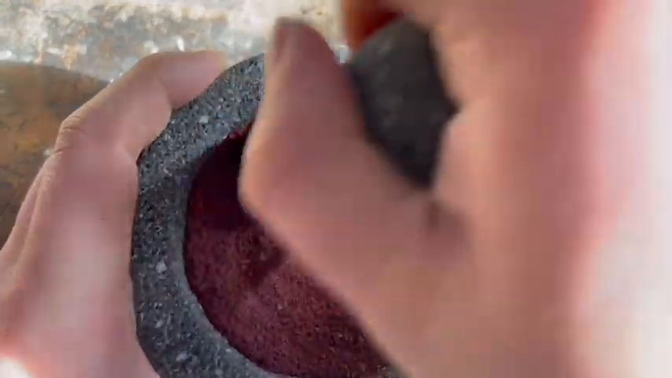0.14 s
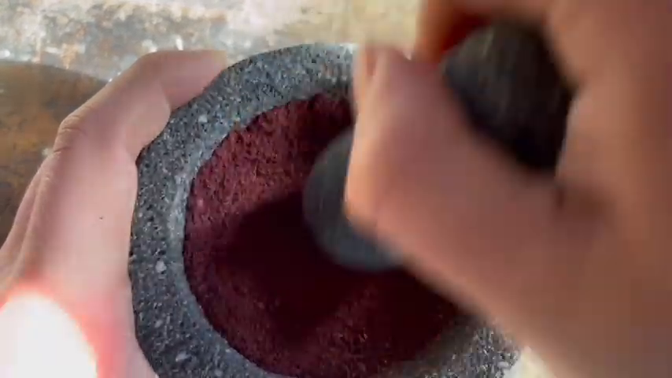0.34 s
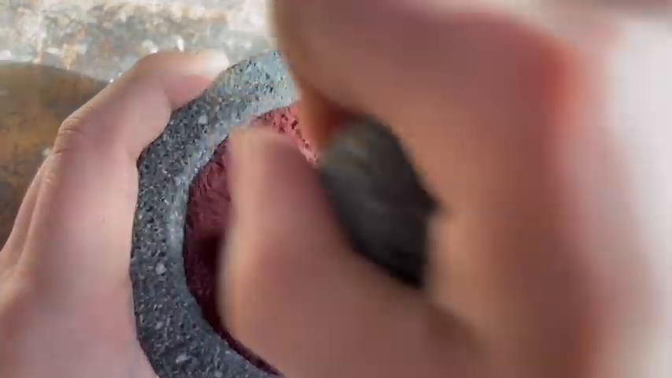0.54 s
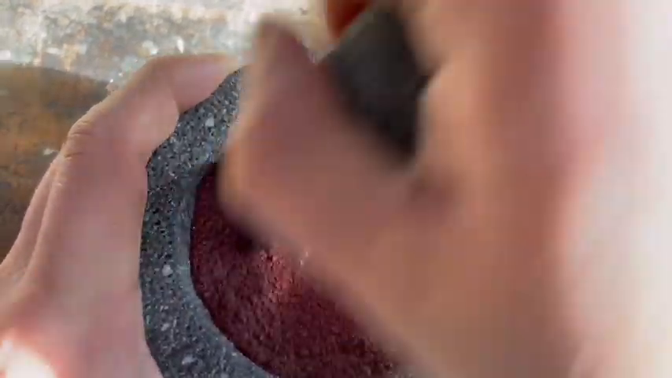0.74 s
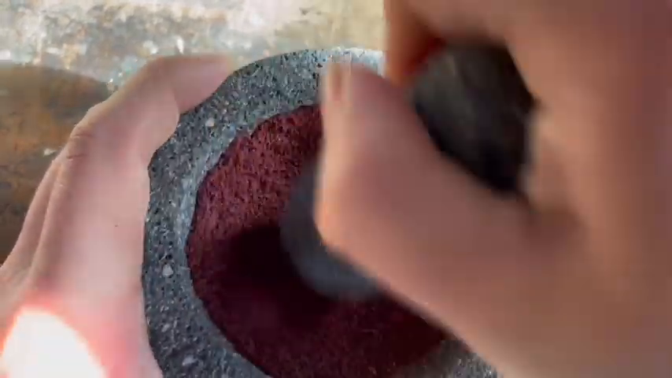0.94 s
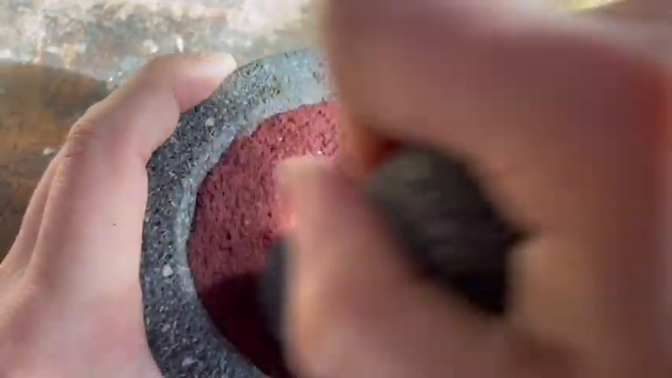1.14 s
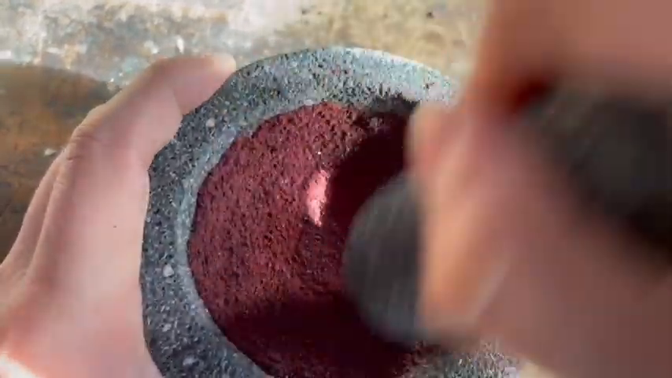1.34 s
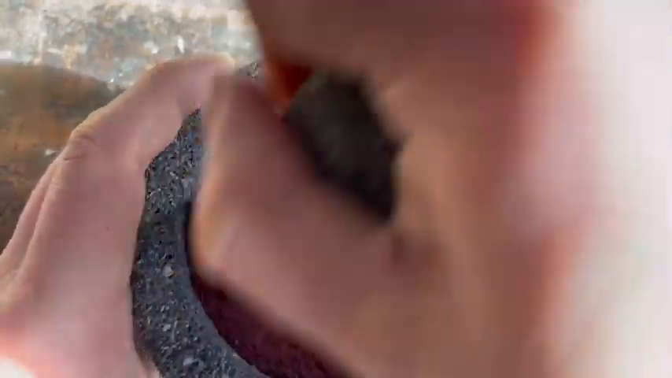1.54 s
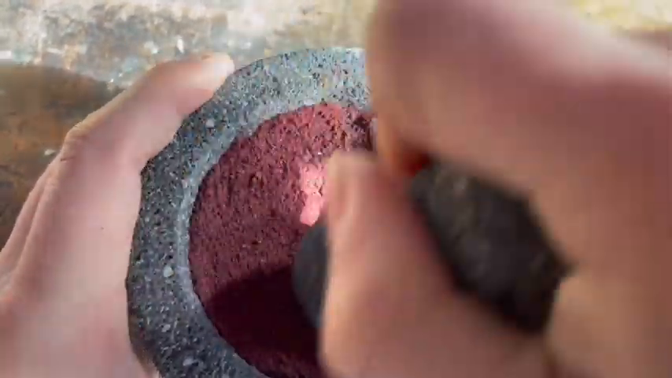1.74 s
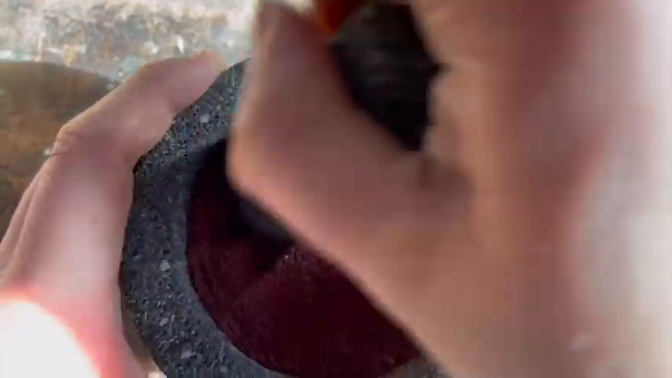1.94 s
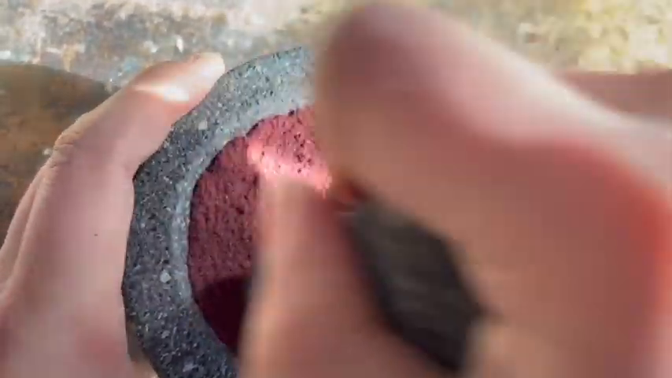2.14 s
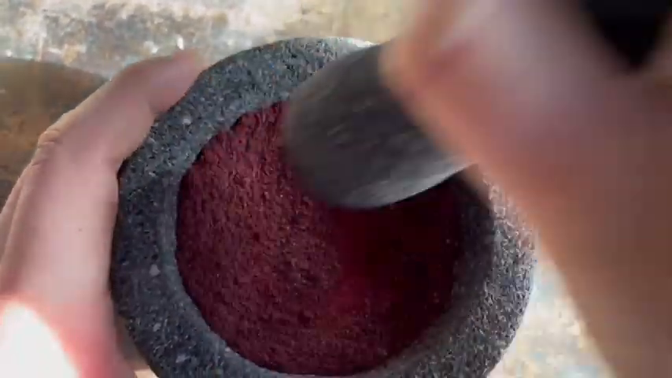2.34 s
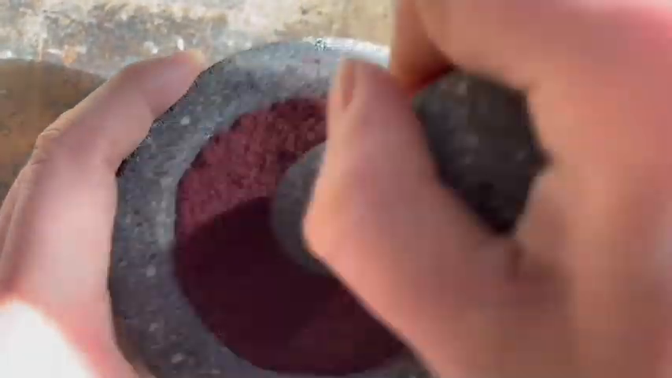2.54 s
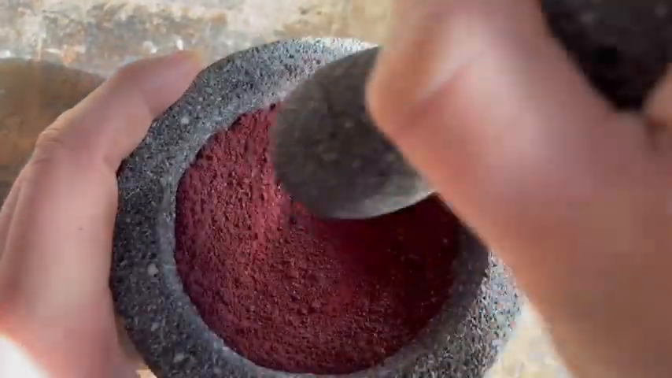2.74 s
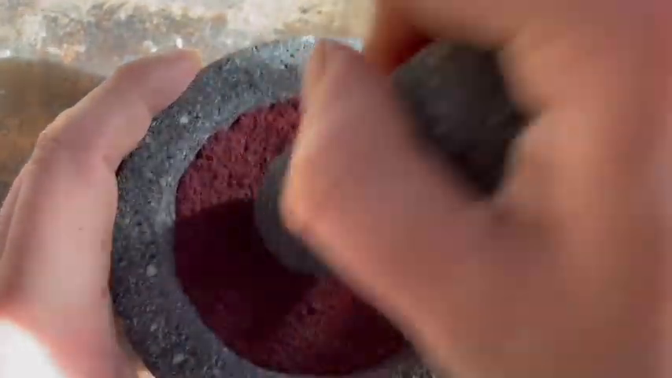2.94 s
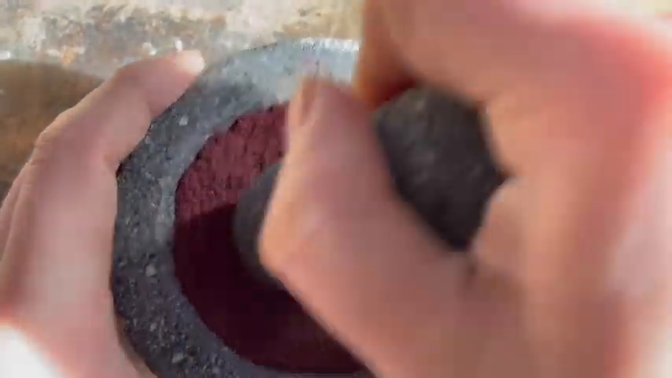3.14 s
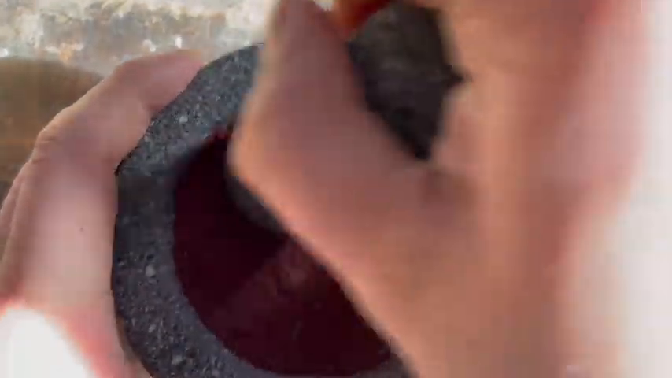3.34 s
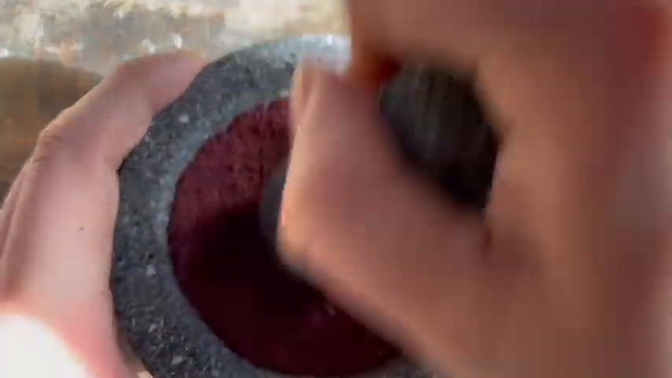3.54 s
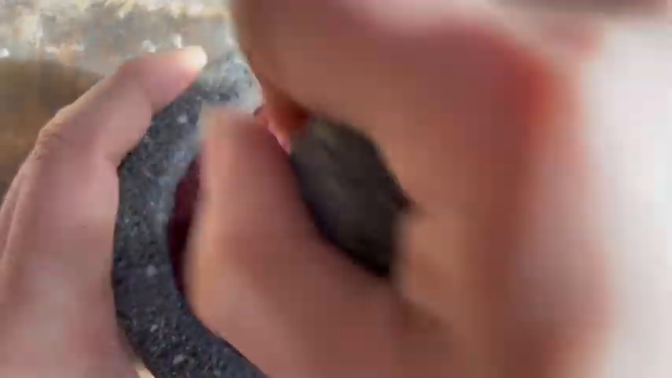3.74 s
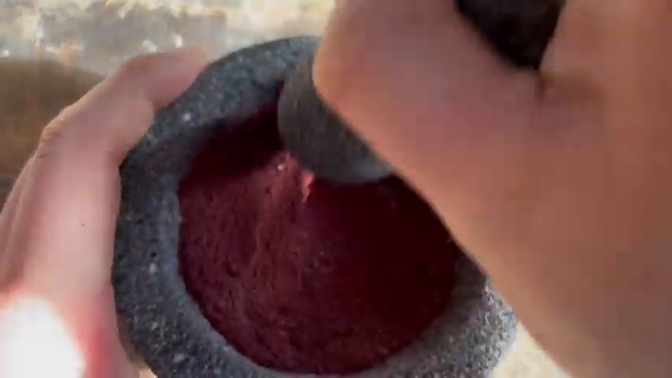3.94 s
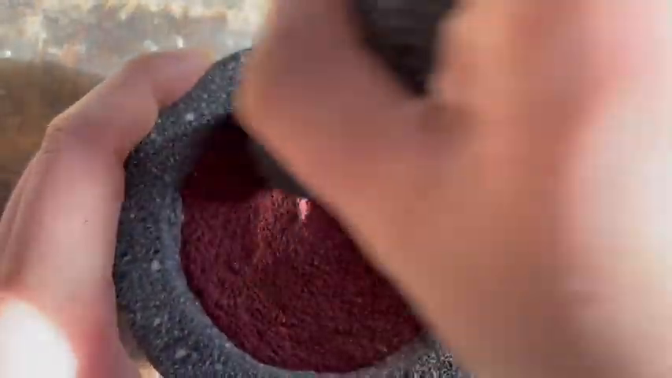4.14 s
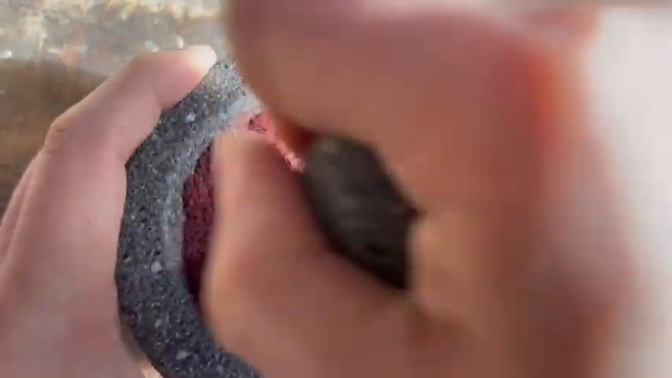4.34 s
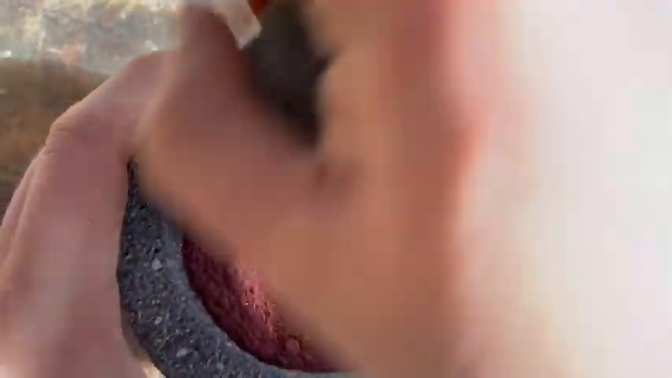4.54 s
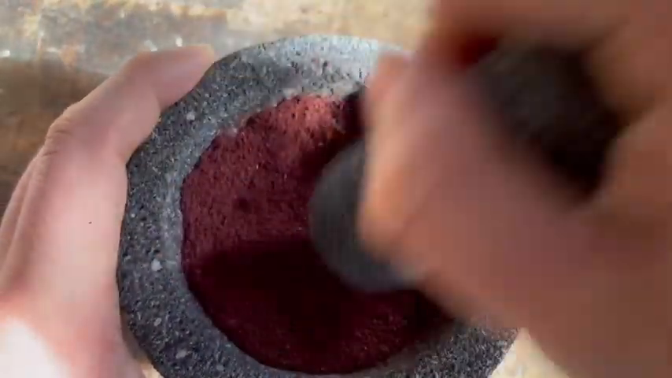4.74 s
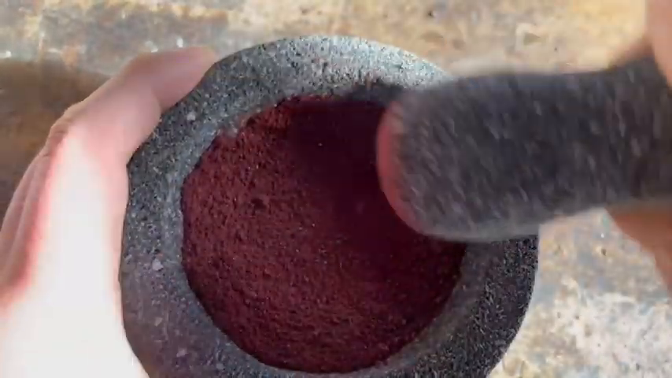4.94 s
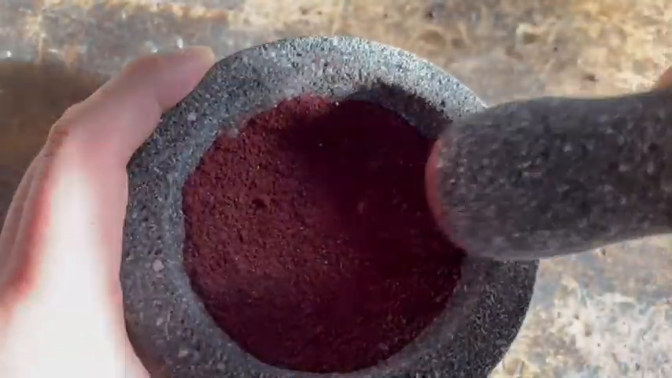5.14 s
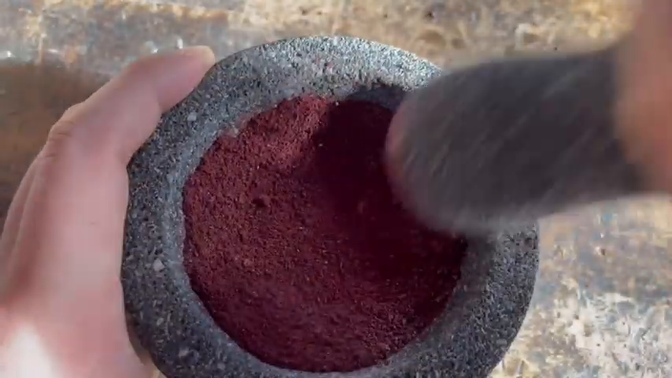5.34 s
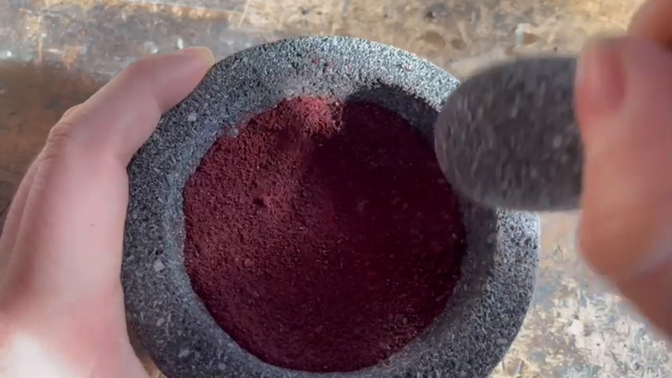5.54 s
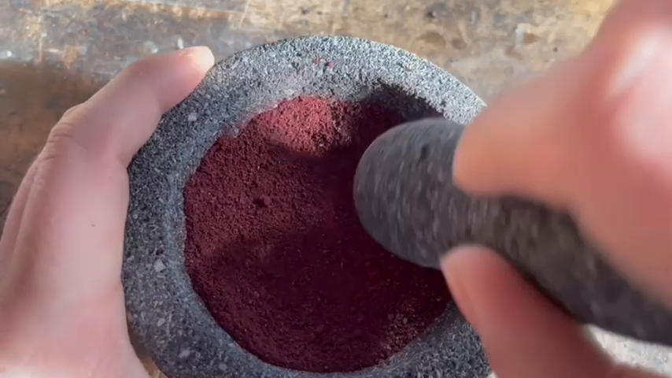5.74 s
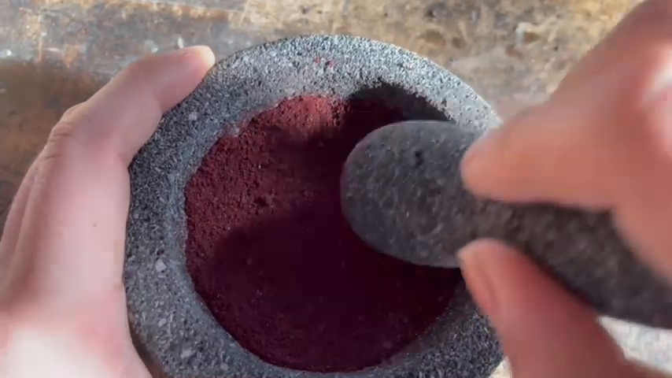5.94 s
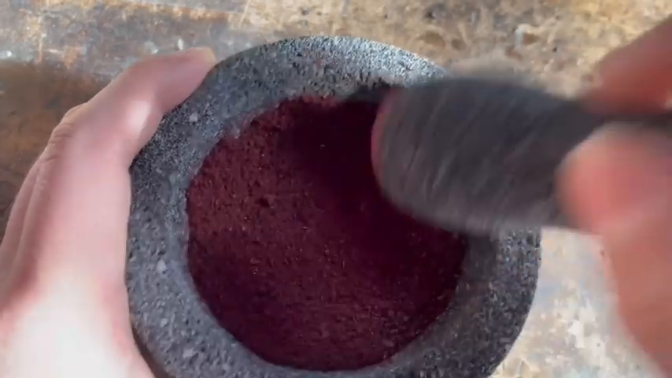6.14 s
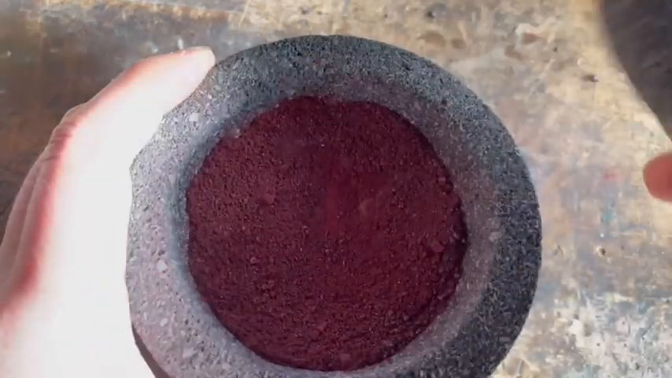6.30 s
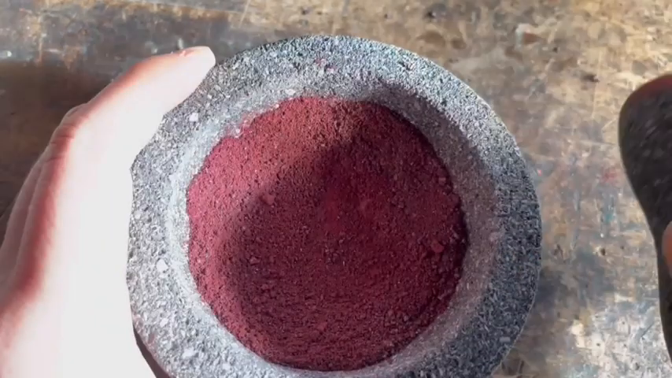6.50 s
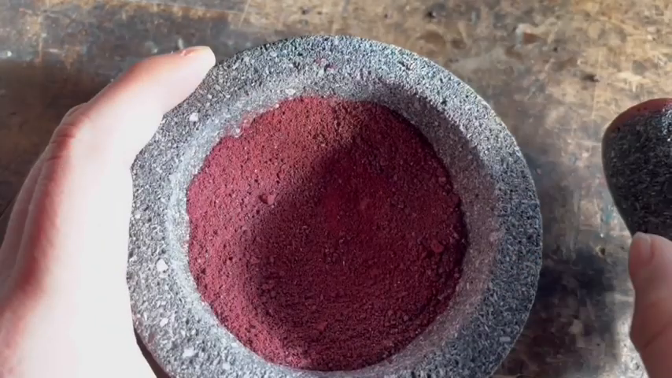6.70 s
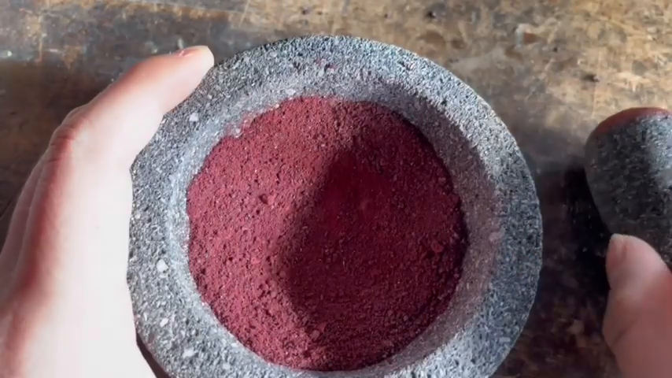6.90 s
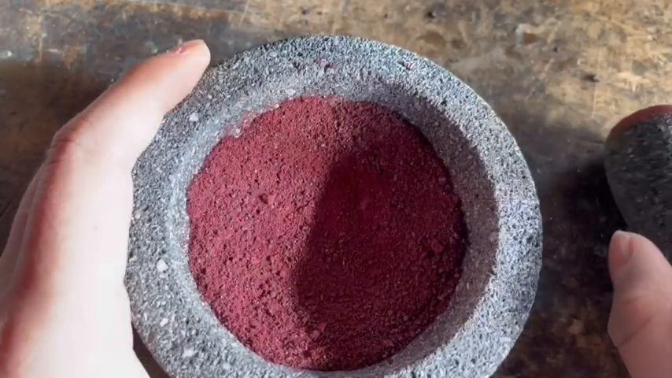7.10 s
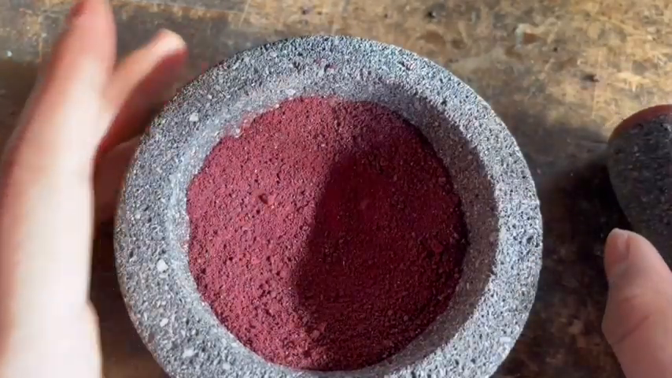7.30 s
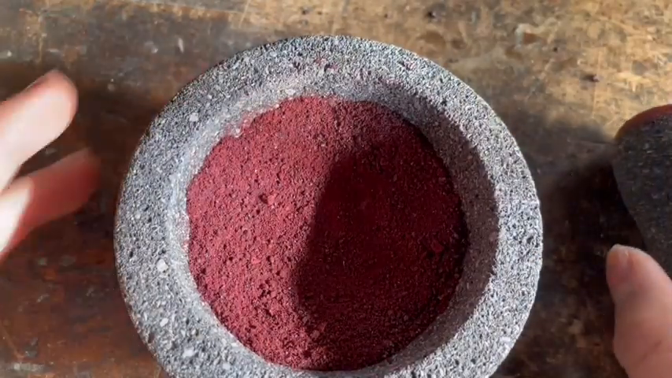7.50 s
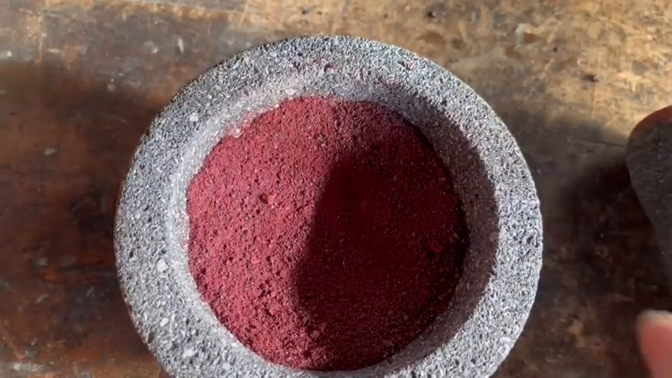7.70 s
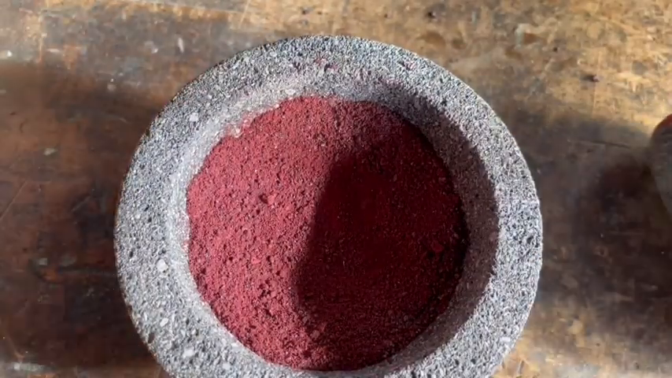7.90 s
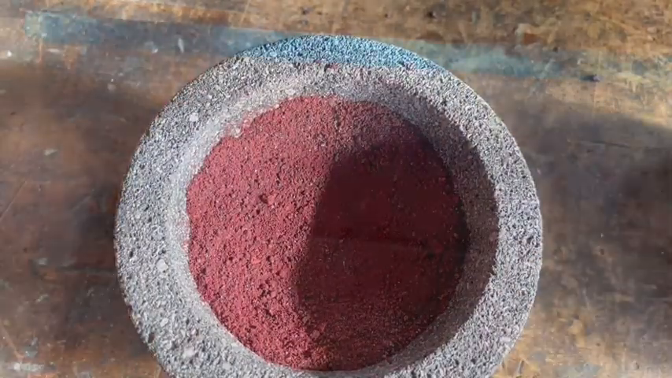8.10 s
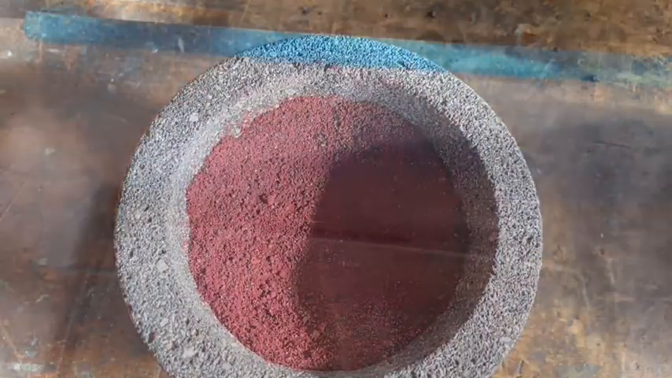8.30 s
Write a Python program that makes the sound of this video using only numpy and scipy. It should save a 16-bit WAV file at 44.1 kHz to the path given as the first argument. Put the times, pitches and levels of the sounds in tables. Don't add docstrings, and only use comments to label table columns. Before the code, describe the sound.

Very close to a small stone mortar, a pestle grinds dry powder in uneven gritty strokes, with lumps crunching. Three hard knocks interrupt, grinding resumes with more blows and low table thuds, then bright taps strike the rim. The pestle is set down on the wooden table with a clattering clunk, and a hand slides softly off the stone. Small indoor room, faint hum.

```python
import sys
import numpy as np
from scipy import signal
from scipy.fft import rfft, irfft, next_fast_len
from scipy.io import wavfile
from scipy.ndimage import uniform_filter1d

SR = 44100
rng = np.random.default_rng(int(sys.argv[2]) if len(sys.argv) > 2 else 0)


def inscribe(sig):
    pcm = np.round(np.clip(np.atleast_2d(sig).T, -1, 1) * 32767)
    wavfile.write(sys.argv[1], SR, pcm.astype(np.int16))


def boost_factor(decibels):
    exponent = np.asarray(decibels, float) / 20
    return 10 ** exponent


N = 368659

# (time [s], peak [dB], then below the peak: pestle ring [dB],
# thick rim [dB], bowl wall [dB])
KNOCK_ROWS = [(0.1592, -27.5, -25, -35, 3), (0.8841, -32, -22, -20, 1.5), (1.0341, -23.5, -11, -44, -8.5),
              (1.3419, -36, -14, -32, -30), (1.97, -29.5, -29, -16, 5), (2.2185, -27.5, -42, -31, 0),
              (2.5199, -7, -15, -13.5, -12.5), (2.809, -8, -26.5, -15.5, -12.5),
              (3.103, -5, -32.5, -25.5, -8), (3.6812, -15, -26, -52, -1), (3.9948, -32.5, -22, -16, -5),
              (4.2149, -11.5, -57, -63, -7), (4.536, -29.5, -15.5, -38.5, 1.5),
              (4.966, -4.5, -17.5, -23, -12), (5.3872, -33.5, 8.5, -11, 4.5),
              (5.686, -11.5, -11.5, -15.5, -10.5), (5.903, -8.5, -7.5, -15.5, -7.5),
              (6.0424, -6, -12, -13.5, -10.5)]
# (pitch [Hz], level when rubbed [dB], level when struck [dB], t60 [s])
BOWL_MODES = [(138, -16, -18, 0.083), (204.2, -8, -6, 0.076), (286.9, -17, -15, 0.17),
              (354, -3.5, -2, 0.041), (471, 0, -12, 0.038), (552, -4, -12, 0.08), (709, -4.5, 1.5, 0.039),
              (834.6, -14.5, -7.5, 0.044), (976, -11.5, 0, 0.027), (1112, -12.5, -12.5, 0.03),
              (1292, -6.5, -4, 0.025), (1443.4, -2, 2, 0.017), (1650, -0.5, -2, 0.0079),
              (1980, -7.5, 0.5, 0.011), (2320, -9.5, -8.5, 0.012), (2610, -14.5, -4.5, 0.014)]
# (time [s], peak [dB])
LAID_DOWN = [
    (6.77, -8),
]


def grinding():
    body_gain, grit_gain = strokes()
    judder = 0.8 * drift(20) + 1.4 * drift(70)
    bed_db = -8
    heavy = grit(6000, 2.5, judder + 0.54 * drift(15))
    heavy = heavy + boost_factor(bed_db + judder) * rng.standard_normal(N)
    fine = grit(7000, 2.7, 1.2 * judder + 1.2 * drift(150))
    fine = fine + boost_factor(bed_db + judder) * rng.standard_normal(N)

    body = rms_one(bowl(soften(heavy, 1800), wander_db=2.27, sway_db=3.0))
    body = boost_factor(-1.0) * body_gain * body
    groan = band_pass(body * on_rim(), 490 / 1.3, 490 * 0.85, order=1)
    bright = rms_one(pestle(fine, fizz_db=10.5, wander_db=2.57, sway_db=4.5))
    return body + boost_factor(7) * groan + boost_factor(3.5) * grit_gain * bright


def strokes():
    # (start [s], length [s], bowl and table [dB], grit and pestle [dB], change over it [dB])
    stroke_rows = [(.018, 0.11, -50.5, -58, 3), (.14, 1.014, -34.5, -48.5, 1.5),
                   (1.343, 0.15, -34, -46.5, -7.5), (1.5, 0.75, -34, -48, -3),
                   (2.24, 0.11, -62.5, -75.5, -10.5), (2.55, 0.25, -55, -79.5, -4.5),
                   (2.84, 0.22, -49.5, -95, -9), (3.13, 0.11, -50, -68.5, 6), (3.24, .44, -34, -49.5, -1),
                   (3.69, 0.15, -32, -47.5, -9), (3.996, .12, -36.5, -44, 2.5),
                   (4.12, 0.05, -39, -49.5, -19.5), (4.16, 0.047, -59, -74.5, 11),
                   (4.21, 0.48, -35, -50.5, 1), (4.98, 0.2, -36, -47.5, 2), (5.39, 0.098, -33.5, -44.5, -1),
                   (5.69, 0.073, -38.5, -48.5, -3), (5.92, 0.12, -39.5, -68, -19.5),
                   (6.05, 0.065, -35, -45.5, -10)]
    # (time [s], pressure [dB], half width [s])
    pressure_rows = [(0.173, 6, 0.019), (.575, -2, 0.018), (.2, 0.5, 0.0041), (.32, 5.5, 0.043),
                     (0.357, -10, 0.019), (0.625, 9, .02), (0.694, -16, 0.0064), (0.871, -7, 0.0094),
                     (.82, 3, 0.012), (.93, 3.5, 0.049), (0.979, -40, 0.0044), (1.013, -19, .008),
                     (1.06, 5, 0.037), (1.13, -4.5, 0.029), (1.484, 0, 0.0083), (1.589, 3, 0.035),
                     (1.711, -5, 0.011), (1.94, -6, 0.019), (1.999, 4, 0.08), (2.13, -2, 0.013),
                     (3.292, -9, 0.031), (3.344, -44, 0.012), (3.631, -15, 0.0074), (3.78, 3.5, 0.026),
                     (4.253, 6, 0.018), (4.51, -4, .02), (4.564, -6, 0.019), (4.64, 3, 0.027),
                     (5.42, -13, 0.011)]
    s = np.arange(N) / SR
    pressure_db = sum(db * np.exp(-((s - at) / width) ** 2) for at, db, width in pressure_rows)
    follows = [0.94, 0.87]
    rubbing = contacts(stroke_rows, attack_s=0.0019, release_s=0.0018)
    rubbing = rubbing * boost_factor(np.outer(follows, pressure_db))
    at, peak_db = np.transpose(KNOCK_ROWS)[:2]
    skid = die_away(clicks(at + 0.008, boost_factor(peak_db)), 0.011)
    return rubbing + skid * boost_factor([[-19], [-54]])


def grit(per_s, spread_db, clump_db):
    sizes = boost_factor(spread_db * np.minimum(rng.exponential(1, N), 5)) * rng.choice([-1, 1], N)
    return sizes * (rng.random(N) < per_s / SR) * boost_factor(clump_db)


def pestle(force, fizz_db, wander_db=0, sway_db=0):
    # (pitch [Hz], level in powder [dB], level on the rim [dB],
    # width in powder [Hz], width on the rim [Hz])
    pestle_modes = [(3202, 1.5, -8, 670, 150), (3607, -7, -6.5, 260, 29), (4980, -0.5, -12, 1900, 200),
                    (6050, 0, -2.5, 240, 130), (7463, -8, 3, 390, 54), (9145, -5.5, -5, 280, 170),
                    (11540, -15, -4.5, 920, 430), (11000, -8.5, -11, 1500, 760),
                    (13700, -21.5, -6.5, 350, 120), (12770, -10, -13, 510, 70), (15600, -33.5, -2, 200, 90)]
    bare = on_rim()
    out = boost_factor(fizz_db - 5.0 * bare) * band_pass(force, 1500, 12000)
    for k, (hz, powder_db, rim_db, powder_hz, rim_hz) in enumerate(pestle_modes):
        mode = boost_factor(powder_db) * ring(force * (1 - bare), hz, 1.81 / powder_hz)
        mode = mode + boost_factor(rim_db) * ring(force * bare, hz, 1.1 / rim_hz)
        if wander_db:
            sway = sway_db * drift(16) * 3000 / hz
            mode = mode * boost_factor(wander_db * drift(7.7) + np.array([sway, -sway]))
        out = out + (-1) ** k * mode
    return out


def on_rim():
    # (start [s], end [s], bare share [0-1])
    bare_rows = [
        (2.5, 2.54, .25),
        (3.95, 4.19, .45),
        (4.85, 5.57, 1.0),
        (5.675, 6.115, 1.0),
    ]
    s = np.arange(N) / SR
    return sum(share * ((s > start) & (s < end)) for start, end, share in bare_rows)


def bowl(force, wander_db=0, sway_db=0):
    out = 0
    for k, (hz, db, _, t60) in enumerate(BOWL_MODES):
        mode = (-1) ** k * boost_factor(db) * ring(force, hz, t60)
        if wander_db:
            sway = sway_db * drift(16)
            mode = mode * boost_factor(wander_db * drift(13) + np.array([sway, -sway]))
        out = out + mode
    return out


def cracks():
    # (time [s], bright peak [dB], dull part relative to it [dB])
    lump_rows = [(0.021, -34.5, 5.5), (0.144, -49.5, 11.5), (0.286, -27.5, -14), (0.3227, -23, -2),
                 (0.483, -25.5, 9.5), (0.611, -25, 7.5), (0.626, -17, -12), (.618, -20, -5),
                 (.189, -37, 9.5), (.591, -36, -2), (0.681, -28, 7.5), (0.779, -28.5, 11),
                 (.918, -31.5, -4), (0.934, -23.5, 5.5), (.965, -33.5, -0.5), (1.526, -36, 1),
                 (1.708, -34, 5), (5.062, -32.5, -0.5), (5.085, -28, 0.5), (5.164, -32.5, -1),
                 (5.186, -40.5, -5.5), (5.434, -33, -4), (1.578, -31, 0), (1.729, -38, -1), (1.812, -34, 4),
                 (1.96, -34, -4), (3.539, -31, 3), (3.57, -34.5, -3.5), (3.605, -32.5, 4),
                 (4.045, -25.5, 7), (4.088, -29, -7.5), (4.11, -23.5, -1.5), (4.2497, -31, 1.5),
                 (4.293, -35.5, 3), (4.381, -37, -3), (4.44, -29.5, 0), (4.478, -32, -1), (0.648, -25, 13),
                 (0.725, -30.5, 14.5), (0.8053, -44.5, 30), (0.9295, -18.5, 10), (0.951, -41, 11),
                 (1.149, -37.5, 20), (5.673, -58, 16), (1.5185, -30.5, 14.5), (2.2224, -58.5, 22),
                 (3.117, -34, 2.5), (3.255, -37, 16), (3.317, -29.5, 8.5), (3.3606, -37.5, 1.5),
                 (4.2694, -32, 19), (4.354, -57.5, 23), (4.613, -36.5, 15), (4.661, -34.5, 7),
                 (5.47, -23.5, 2), (5.4878, -26, 6), (7.3572, -45.5, -19), (7.3778, -52, -27)]
    # (time [s], peak [dB])
    tick_rows = [(2.369, -57), (2.447, -68.5), (2.568, -56.5), (2.882, -52), (2.279, -55), (2.295, -61),
                 (2.349, -67.5), (2.655, -66), (2.673, -68.5)]
    s, peak_db, dull_db = np.transpose(lump_rows + [(*row, -22.5) for row in tick_rows])
    splinters = rng.standard_normal((2, N))
    bright = pestle(swell(s, peak_db - 12.5, 0.0012) * splinters[0], fizz_db=10.0)
    dull = swell(s, peak_db + dull_db - 24.5, 0.0027) * splinters[1]
    return bright + bowl(soften(dull, 2700))


def knocks():
    # (time [s], peak [dB])
    touch_rows = [(2.51, -31), (2.798, -41.5), (3.092, -44.5), (5.891, -53.5), (6.031, -46.5)]
    # (pestle ring [dB], thick rim [dB], bowl wall [dB])
    touch_colour = (-15.5, -17.5, -9)
    # (time [s], peak [dB])
    lead_in_rows = [(2.5208, -10.5), (2.8112, -16), (3.1046, -21.5), (4.9675, -26), (6.0438, -20.5)]
    rows = KNOCK_ROWS + [(*row, *touch_colour) for row in touch_rows]
    s, peak_db, ring_db, rim_db, wall_db = np.transpose(rows)
    luck = rng.normal(0, 1, (len(s), len(BOWL_MODES)))
    grain = 0.65 + drift(130)
    out = 0
    for k, (hz, _, db, t60) in enumerate(BOWL_MODES):
        if hz < 500:
            zone_db = wall_db - 5 + 7.0
        elif hz < 1000:
            zone_db = wall_db + 3.5
        else:
            zone_db = 0 if hz < 1800 else rim_db + 14.5
        sizes = (-1) ** k * boost_factor(peak_db + db + zone_db + 1.3 * luck[:, k])
        force = soften(clicks(s + 2.1 / hz, sizes), 0.87 * hz)
        thump = boost_factor(-4.5) * ring(force, hz, 14 / hz)
        after_db = -7.0 if hz < 900 else -11.0
        out = out + thump + boost_factor(after_db) * np.roll(grain, 5000 * k) * ring(force, hz, 2.03 * t60)

    sharp = clicks(s, boost_factor(peak_db + ring_db + 17))
    chips = die_away(sharp * boost_factor(3.95 * on_rim()), 0.0037) * rng.standard_normal(N)
    bright_hiss = swell(s, peak_db - 49.5, 0.012) * rng.standard_normal(N)
    out = out + band_pass(bright_hiss, 2500, 6500)
    lead_in_s, lead_in_db = np.transpose(lead_in_rows)
    lead_in = ring(clicks(lead_in_s, boost_factor(lead_in_db))[::-1], 1800, 0.014)[::-1]
    return out + lead_in + pestle(soften(soften(sharp, 2100), 3500) + boost_factor(-42.0) * chips, fizz_db=-8.5)


def thuds():
    # (time [s], peak [dB], pitch [Hz])
    thud_rows = [(0.798, -43.5, 244), (3.302, -25, 81.5), (3.777, -13, 256), (3.803, -12.5, 93),
                 (3.793, -21, 136), (4.338, -16, 75.4), (4.762, -14, 90.4), (5.248, -25, 77.3),
                 (5.257, -32, 325), (5.71, -26, 136.4), (6.781, -29, 130.3), (6.857, -29, 66.8),
                 (6.966, -38, 62.8)]
    s, peak_db, pitch_hz = np.transpose(thud_rows)
    shudder_db = peak_db - 20 + 9 * np.log2(pitch_hz / 150)
    shudder = swell(s, shudder_db, 0.014) * rng.standard_normal(N)
    out = bowl(soften(soften(shudder, 160), 400))
    for at, db, hz in thud_rows:
        start = ring(clicks([at], boost_factor(db + 6.0)), hz, 0.03) * 2 * np.pi * 20 / SR
        out = out + ring(start, hz, 18 / hz)
    return out


def laying_down():
    # (time after landing [s], level [dB])
    bump_rows = [
        (0, -6),
        (.003, -7.5),
        (.0065, -8.5),
        (.015, -27),
        (.027, -24.5),
    ]
    # (pitch [Hz], level [dB], t60 [s])
    table_modes = [(251, -19.5, 0.68), (352, -13, 0.28), (440, -15, 0.2), (729, -5, 0.098),
                   (889, -17.5, 0.144), (972, -13, 0.15), (1010, -36, 0.11), (1300, -5.5, 0.15),
                   (1580, -14, 0.092), (1744, -8.5, 0.046), (2344, -11, 0.027), (2810, -19, 0.035),
                   (4550, -39, 0.044), (6000, -27, 0.061)]
    (s, peak_db), = LAID_DOWN
    rattle = swell([s], peak_db - 47, 0.029) * rng.standard_normal(N)
    after, bump_db = np.transpose(bump_rows)
    bumps = clicks(s - 0.001 + after, boost_factor(peak_db + bump_db) * (-1) ** np.arange(len(after)))
    grain = 0.5 + drift(190)
    graze = swell([s - 0.016], peak_db - 49.5, 0.0077) * rng.standard_normal(N)
    force = bumps + rattle + graze
    out = boost_factor(-12.0) * soften(soften(force, 2500), 4000)
    for k, (hz, db, t60) in enumerate(table_modes):
        taken = (-1) ** k * boost_factor(db) * soften(force, 3.6 * hz)
        out = out + boost_factor(-3.0) * np.roll(grain, 5000 * k) * ring(taken, hz, 0.66 * t60)
        out = out + boost_factor(-1.5) * ring(taken, hz, 14 / hz)
    return out


def settling():
    # (time [s], level [dB])
    rock_rows = [
        (6.789, -70),
        (6.89, -60.5),
        (7.009, -54),
    ]
    noise = rng.standard_normal((2, N))
    shiver = swell([LAID_DOWN[0][0]], -64.5, 0.05) * noise[0]
    shiver = signal.sosfilt(signal.butter(6, 2750, fs=SR, output="sos"), shiver)
    s, db = np.transpose(rock_rows)
    rocking = ring(swell(s, db - 16, 0.012) * noise[1], 6170, 0.023)
    return boost_factor(20.5) * shiver + rocking


def hand():
    # (start [s], length [s], bright [dB], dull [dB], change over it [dB])
    hand_rows = [(1.27, 0.048, -72, -90, 3.5), (5.585, 0.033, -59, -84, -5.5),
                 (6.14, 0.022, -66.5, -62, 4.5), (6.19, 0.12, -71, -83, 6), (6.99, 0.024, -67, -81, -3),
                 (7.19, 0.16, -65.5, -77.5, 6), (7.35, 0.29, -67.5, -66.5, -1.5),
                 (7.65, 0.27, -70.5, -69.5, -8.5), (7.42, 0.14, -98, -61, -12),
                 (7.98, 0.098, -68, -68.5, -3), (8.2, 0.072, -77.5, -92, -4.5)]
    spill_rows = [
        (2.529, 0.27, -86, -56, -16),
        (2.82, 0.53, -90, -67.5, -8.5),
    ]
    # (frequency [Hz], level [dB])
    rub_spectrum = [(1500, -27.5), (3500, -4.5), (5000, -6), (8000, 0.5), (10000, -9.5), (13000, -12),
                    (16000, -39.5)]
    # (frequency [Hz], level [dB])
    drag_spectrum = [(200, 4), (500, 1.5), (1000, -3.5), (2000, -5.5), (3000, -2.5), (4200, -11),
                     (8000, -44)]
    # (time [s], pitch [Hz], level [dB])
    cupped_rows = [(7.2, 4600, -95), (7.28, 4000, -78), (7.4, 3100, -77), (7.52, 2900, -76),
                   (7.62, 3300, -79), (7.76, 4000, -78), (7.92, 3700, -90)]
    bright, dull = contacts(hand_rows + spill_rows, attack_s=0.05, release_s=0.035)
    rub = coloured(grit(15000, 1.4, 0.59 * drift(30)), rub_spectrum)
    drag = coloured(grit(13000, 1.3, 1.2 * drift(27.8)), drag_spectrum)
    s, pitch_hz, _ = np.transpose(cupped_rows)
    phase = 2 * np.pi * np.cumsum(np.interp(np.arange(N) / SR, s, pitch_hz)) / SR
    hollow = drift(130) * np.sin(phase)
    hollow = hollow + boost_factor(-2.5) * drift(130) * np.sin(1.6 * phase)
    hollow_gain = boost_factor(in_time(cupped_rows)[1])
    return bright * rms_one(rub) + dull * rms_one(drag) + hollow_gain * hollow


def rumble():
    # (time [s], level [dB])
    effort_rows = [(0.0, -51), (0.32, -53.5), (0.81, -47), (1.09, -54), (2.12, -52), (2.51, -61.5),
                   (3.12, -54), (3.33, -41.5), (3.56, -54.5), (3.98, -50), (4.68, -53.5), (4.87, -45),
                   (5.08, -60), (6.1, -51), (6.36, -67.5), (6.63, -74), (6.84, -66.5), (8.36, -75)]
    push = rng.standard_normal(N) * boost_factor(0.55 * drift(8))
    sway = ring(push, 64, 0.26) + boost_factor(-3.0) * ring(push, 77, 0.11)
    return boost_factor(in_time(effort_rows)[0] + 6.0) * rms_one(sway)


def room_tone():
    # (frequency [Hz], level [dB])
    air_spectrum = [(15, -37), (25, -11), (54, -8.5), (142, -30.5), (286, -23.5), (326, -31), (709, -41.5),
                    (811, -41), (2020, -46), (15000, -52)]
    shared, left, right = rng.standard_normal((3, N))
    tone = coloured(shared + 0.46 * np.array([left, right]), air_spectrum)
    return boost_factor(-70 + 1.0 * drift(3)) * rms_one(alike_above(tone, 3000))


def room(x):
    t60_s, wall_cut_hz = 0.42, 5300
    size = next_fast_len(N + SR)
    w = 2 * np.pi * np.fft.rfftfreq(size)
    dull = 1 / (1 + 1j * w * SR / (2 * np.pi * wall_cut_hz))
    out = np.zeros((2, len(w)), complex)
    for k, lag in enumerate((rng.uniform(0.003, 0.028, 16) * SR).astype(int)):
        loop = boost_factor(-60 * lag / SR / t60_s) * dull ** (lag / SR / 0.03) * np.exp(-1j * w * lag)
        out[k % 2] += loop / (1 - loop) * (-1) ** (k // 2)
    return irfft(out * rfft(x, size), size)[:, :N] / 4


def ports(x):
    # (frequency [Hz], phase [rad])
    lead_curve = [(120, -.3), (350, -1.1), (690, -1.2), (1640, 1.5), (1890, 0), (2500, 1.1), (5340, .3),
                  (6700, -3.1), (7430, -3.1), (8300, -3.2), (9820, -6.2), (11800, -6.4), (13000, -8.7),
                  (16000, -10.2)]
    # (frequency [Hz], level [dB])
    tilt_curve = [(60, 3.2), (125, 1), (250, 2.4), (500, 1), (1200, 5.2), (2400, 5.4), (5000, 2.4),
                  (6500, 0), (16000, 0)]
    size = next_fast_len(N + 4096)
    hz = np.fft.rfftfreq(size, 1 / SR)
    lead = uniform_filter1d(np.interp(hz, *np.transpose(lead_curve)), size=500)
    half = boost_factor(at_hz(tilt_curve, hz) / 2) * np.exp(0.5j * lead)
    return irfft(rfft(x, size) * np.array([half, 1 / half]), size)[:, :N]


def alike_above(pair, cut_hz):
    mid = np.mean(pair, axis=0)
    return mid + soften(soften(pair - mid, cut_hz), cut_hz)


def contacts(rows, attack_s, release_s):
    out = np.zeros((2, N))
    for start, length, first_db, second_db, change_db in rows:
        at = int(start * SR)
        s = np.arange(min(N - at, int((length + 12 * release_s) * SR))) / SR
        edges = np.minimum(s / attack_s, 1) * np.exp(-np.maximum(s - length, 0) / release_s)
        change = boost_factor(change_db * np.minimum(s / length, 1))
        out[:, at:at + len(s)] += boost_factor([[first_db], [second_db]]) * change * edges
    return out


def clicks(times, sizes):
    out = np.zeros(N)
    np.add.at(out, np.minimum((np.asarray(times) * SR).astype(int), N - 1), sizes)
    return out


def swell(times, db, rise_s):
    fade = np.exp(-1 / (rise_s * SR))
    return signal.lfilter([1 - fade], [1, -2 * fade, fade ** 2], clicks(times, boost_factor(db)) + 1e-18)


def die_away(x, fade_s):
    return signal.lfilter([1], [1, -np.exp(-1 / (fade_s * SR))], x + 1e-18)


def ring(force, hz, t60):
    r, w = boost_factor(-60 / (t60 * SR)), 2 * np.pi * hz / SR
    return signal.lfilter([0, np.sin(w)], [1, -2 * r * np.cos(w), r * r], force + 1e-18)


def drift(rate_hz):
    r = np.exp(-2 * np.pi * rate_hz / SR)
    slow = signal.lfilter([1], [1, -2 * r, r * r], rng.standard_normal(N + 9000))[9000:]
    return slow / np.std(slow)


def soften(x, cut_hz):
    return signal.sosfilt(signal.butter(2, min(cut_hz, 0.45 * SR), fs=SR, output="sos"), x)


def band_pass(x, low_hz, high_hz, order=2):
    return signal.sosfilt(signal.butter(order, [low_hz, high_hz], "band", fs=SR, output="sos"), x)


def coloured(x, spectrum):
    return irfft(rfft(x) * boost_factor(at_hz(spectrum, np.fft.rfftfreq(N, 1 / SR))), N)


def at_hz(points, hz):
    f, v = np.transpose(points)
    return np.interp(np.log(hz + 1), np.log(f + 1), v)


def in_time(rows):
    s, *columns = np.transpose(rows)
    return [np.interp(np.arange(N) / SR, s, c, left=-150, right=-150) for c in columns]


def rms_one(x):
    return x / np.sqrt(np.mean(x ** 2) + 1e-20)


def scene():
    rubbing = grinding() + cracks() + hand()
    blows = knocks() + laying_down() + settling()
    low = thuds() + rumble()
    sent = boost_factor(-14.5) * np.mean(rubbing, axis=0) + boost_factor(-19) * blows + boost_factor(-9.5) * low
    echoes = alike_above(room(sent), 4500)
    return ports(rubbing + blows + low + echoes + room_tone())


def roll_off(x):
    return signal.sosfilt(signal.butter(12, 16600, fs=SR, output="sos"), x)


def record(dry):
    miked = signal.sosfilt(signal.butter(3, 40, "high", fs=SR, output="sos"), dry)
    miked = signal.sosfilt(signal.cheby2(8, 50, 16700, fs=SR, output="sos"), miked)
    rounded = 1.345 * np.tanh(miked / 1.222)
    return roll_off(rounded)


dry = scene()
out = record(dry)
inscribe(out)
```